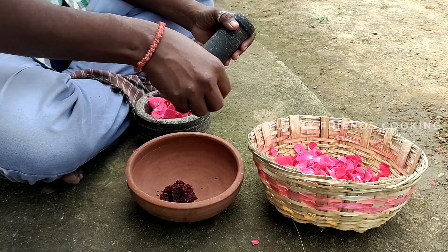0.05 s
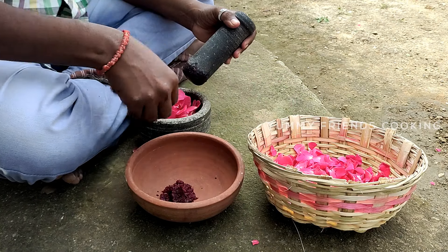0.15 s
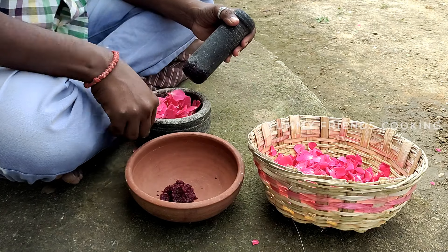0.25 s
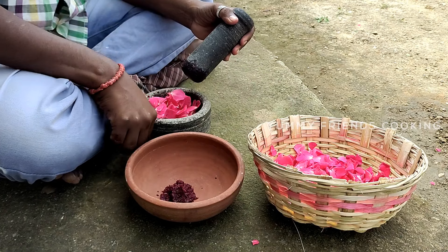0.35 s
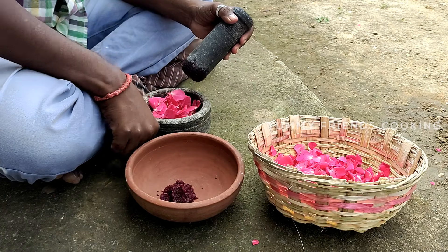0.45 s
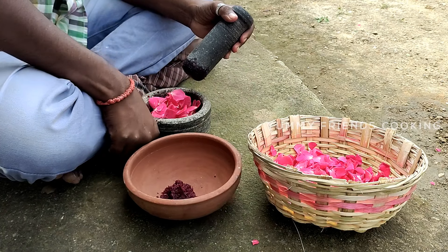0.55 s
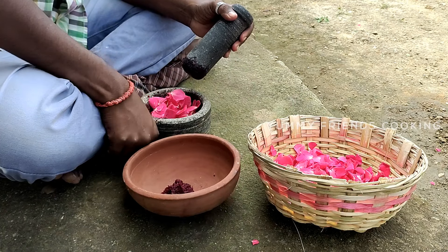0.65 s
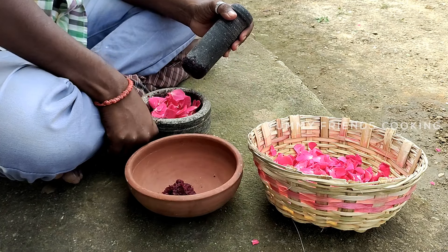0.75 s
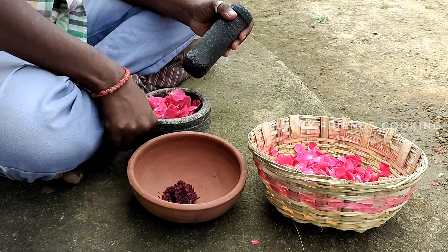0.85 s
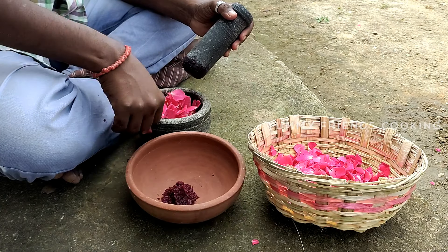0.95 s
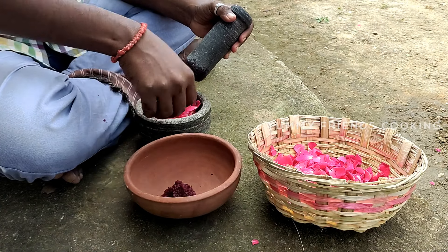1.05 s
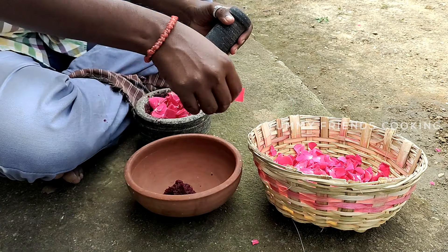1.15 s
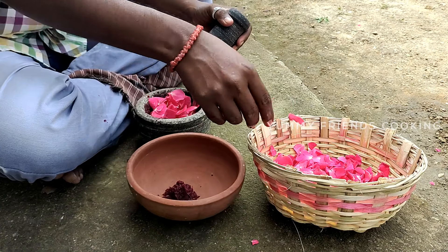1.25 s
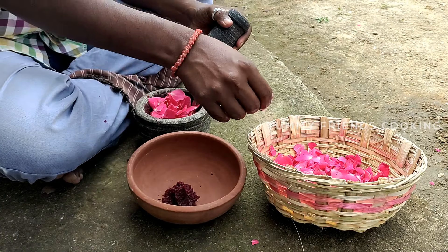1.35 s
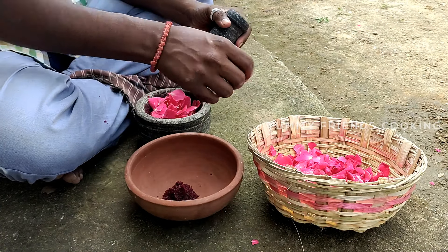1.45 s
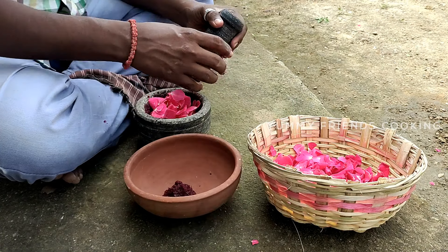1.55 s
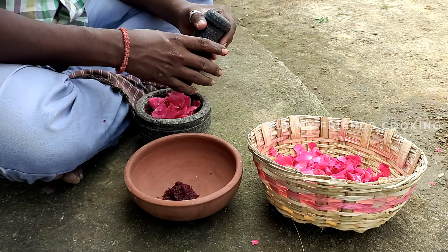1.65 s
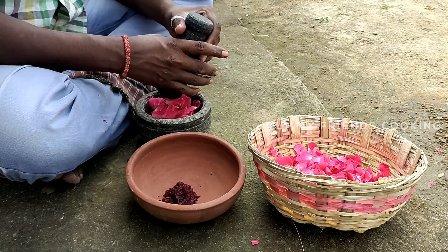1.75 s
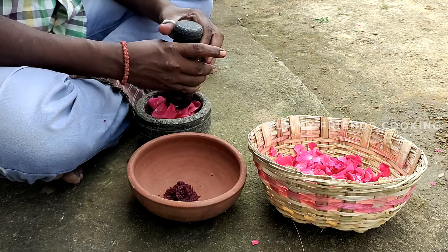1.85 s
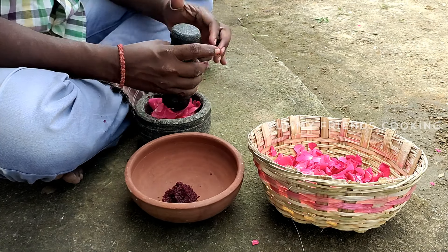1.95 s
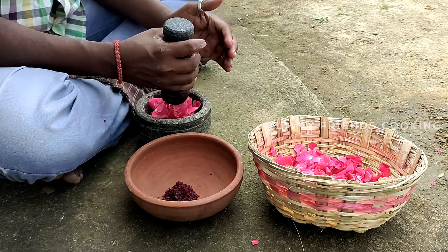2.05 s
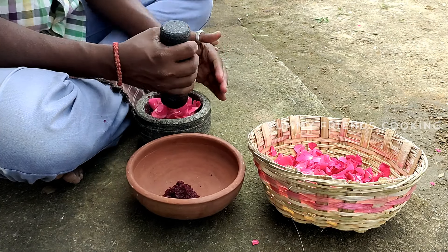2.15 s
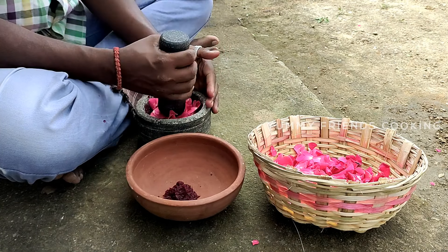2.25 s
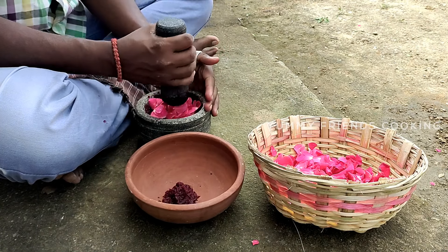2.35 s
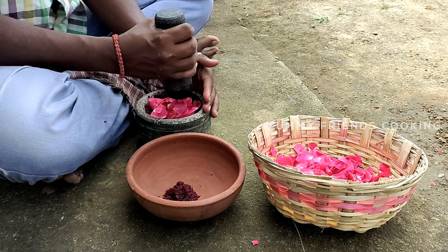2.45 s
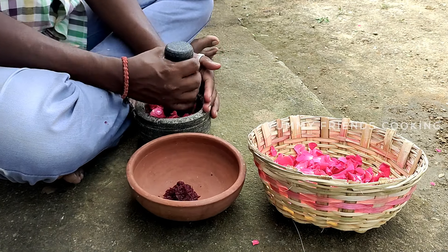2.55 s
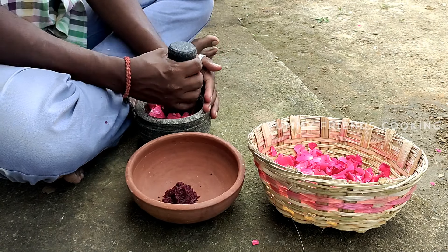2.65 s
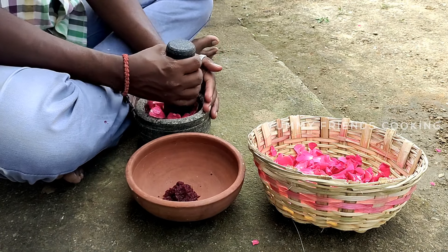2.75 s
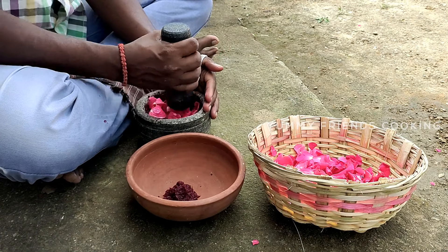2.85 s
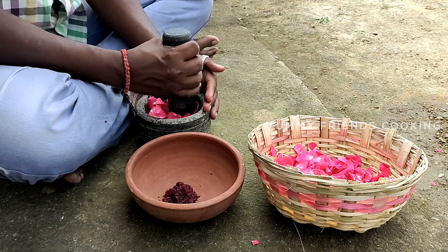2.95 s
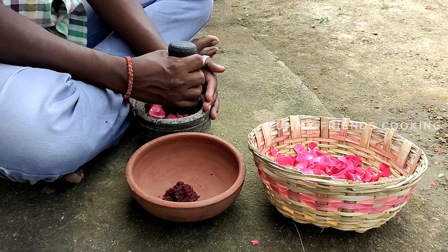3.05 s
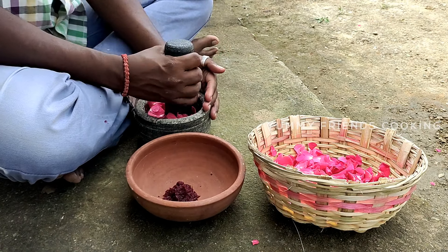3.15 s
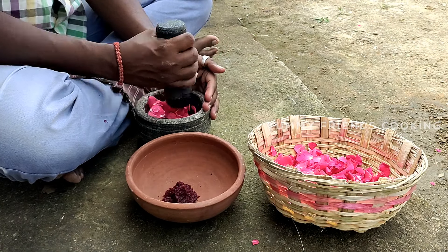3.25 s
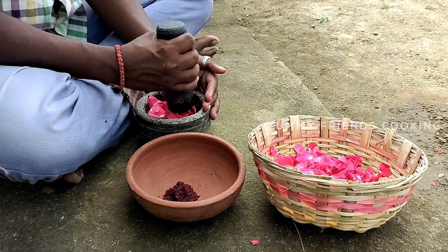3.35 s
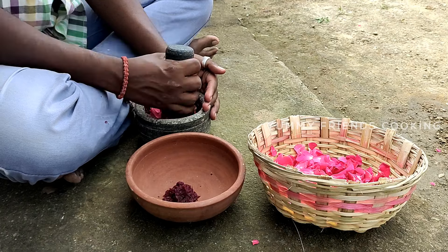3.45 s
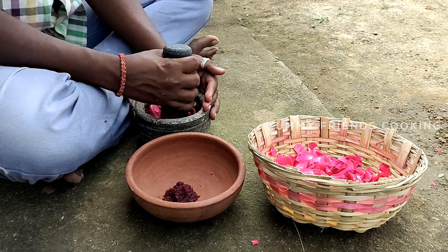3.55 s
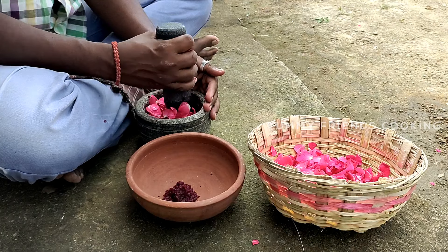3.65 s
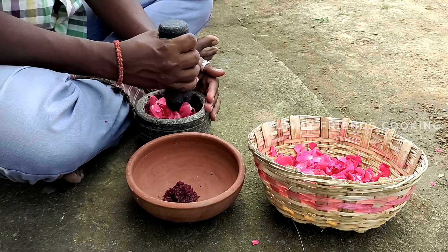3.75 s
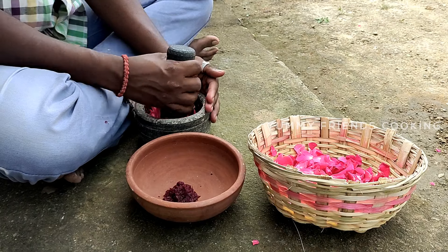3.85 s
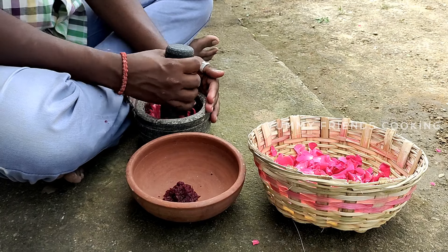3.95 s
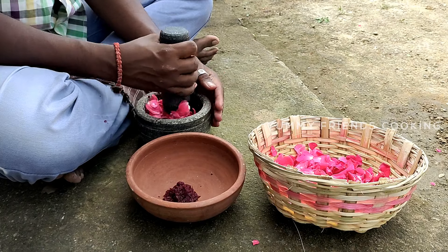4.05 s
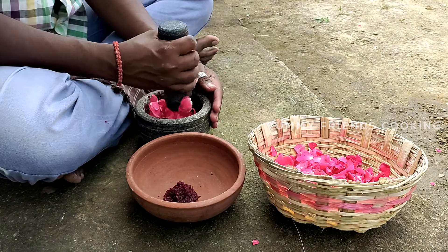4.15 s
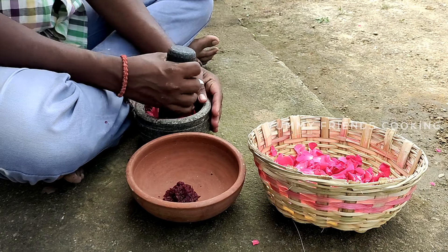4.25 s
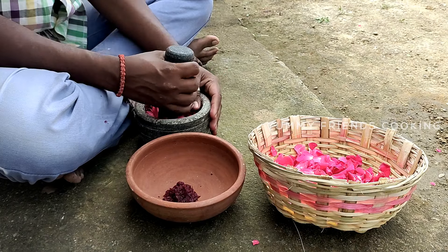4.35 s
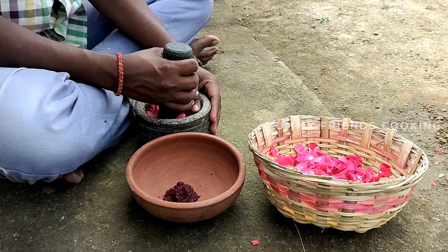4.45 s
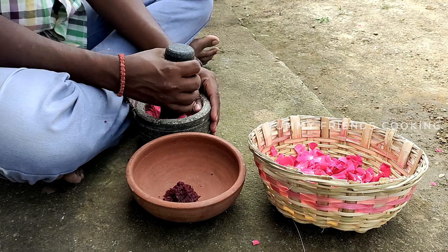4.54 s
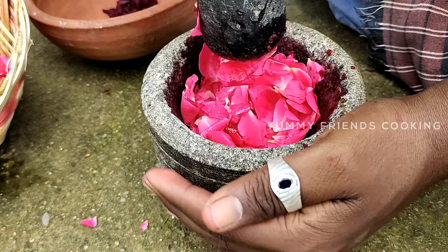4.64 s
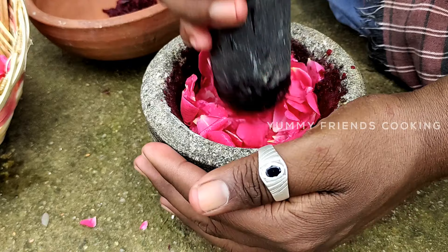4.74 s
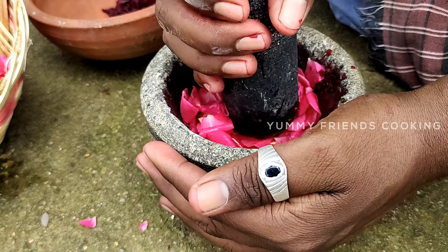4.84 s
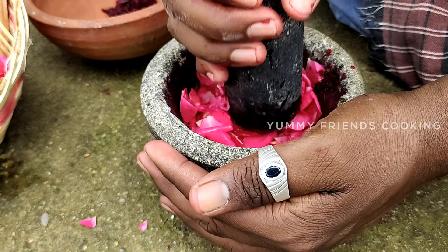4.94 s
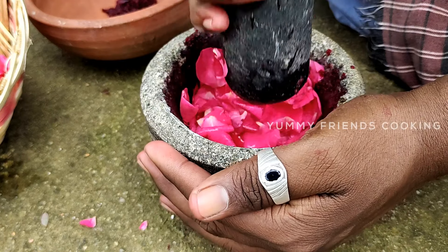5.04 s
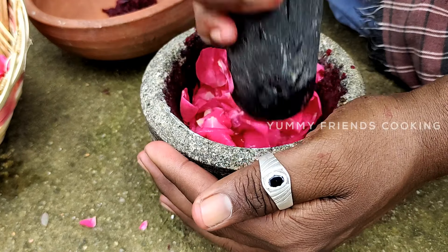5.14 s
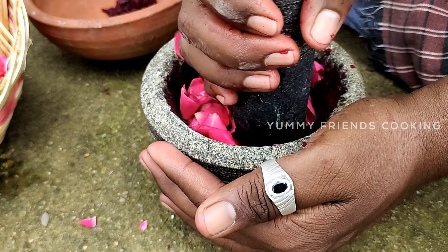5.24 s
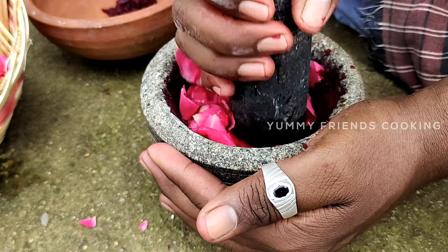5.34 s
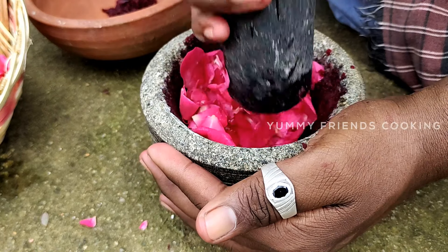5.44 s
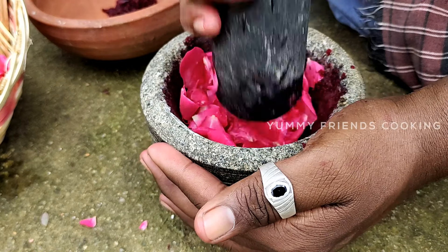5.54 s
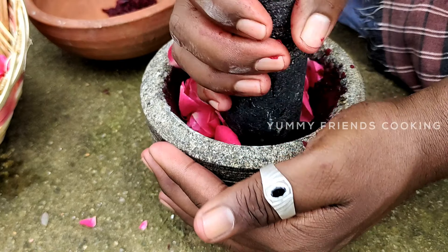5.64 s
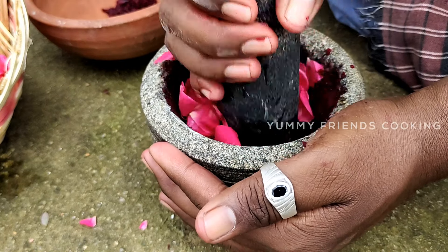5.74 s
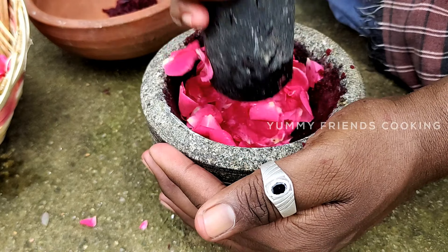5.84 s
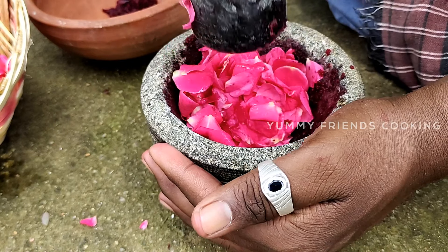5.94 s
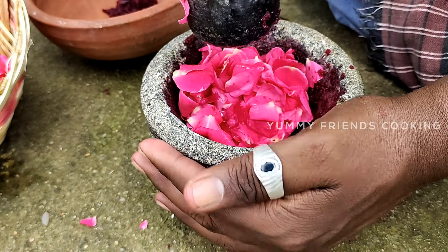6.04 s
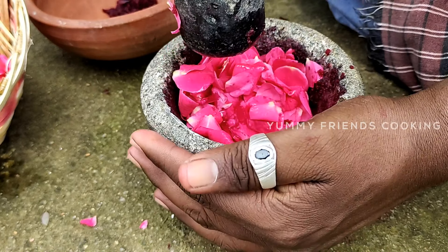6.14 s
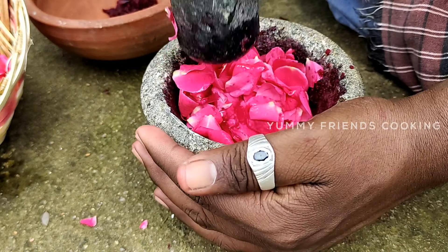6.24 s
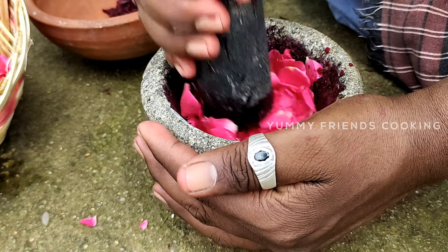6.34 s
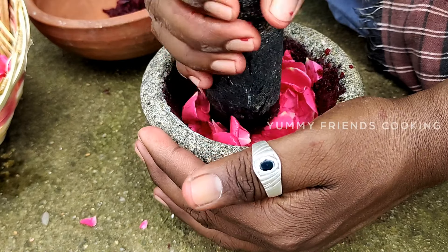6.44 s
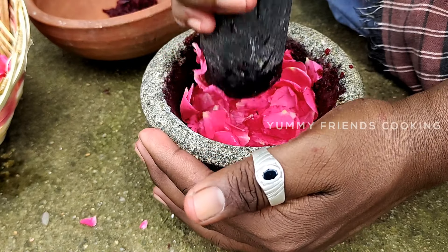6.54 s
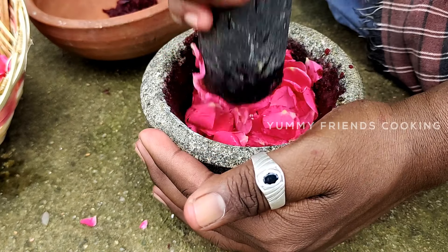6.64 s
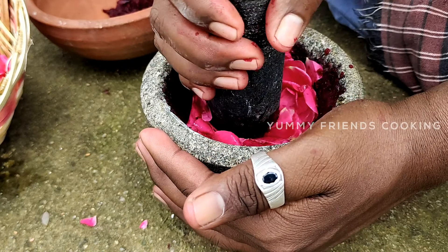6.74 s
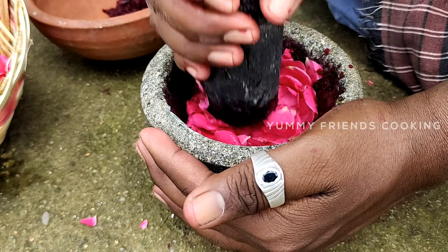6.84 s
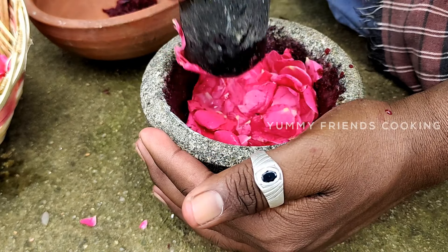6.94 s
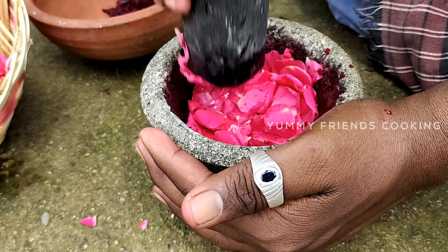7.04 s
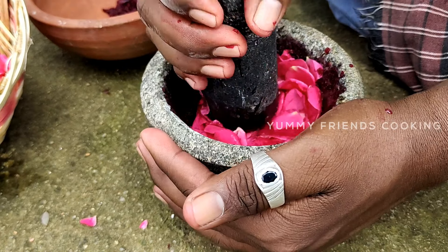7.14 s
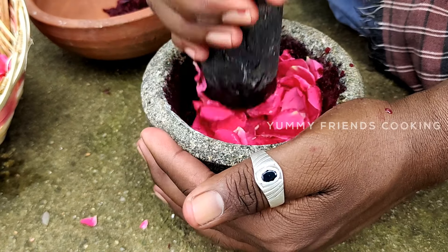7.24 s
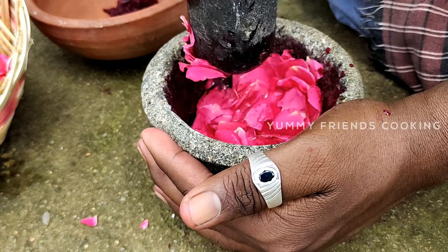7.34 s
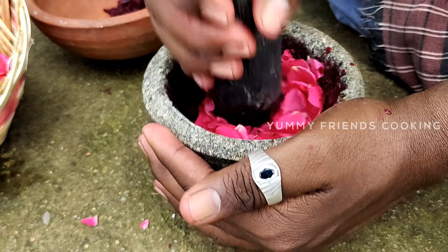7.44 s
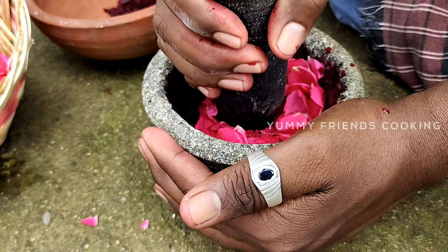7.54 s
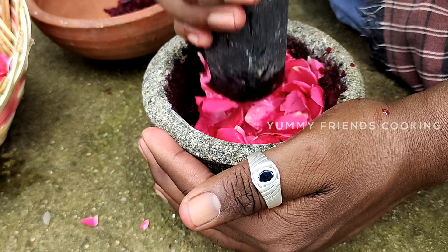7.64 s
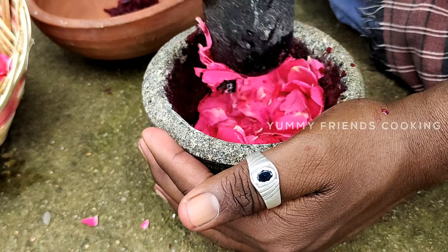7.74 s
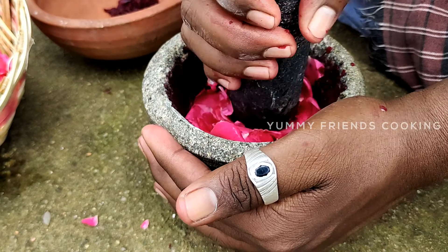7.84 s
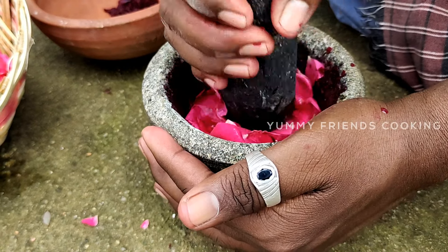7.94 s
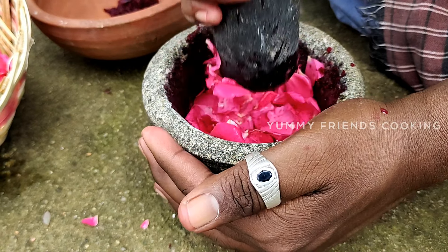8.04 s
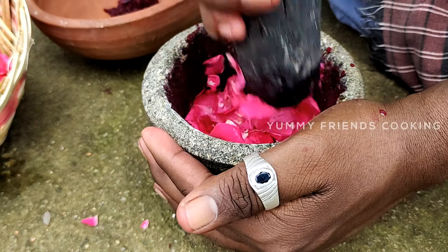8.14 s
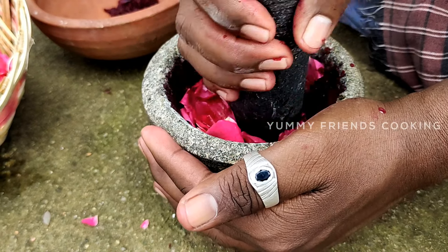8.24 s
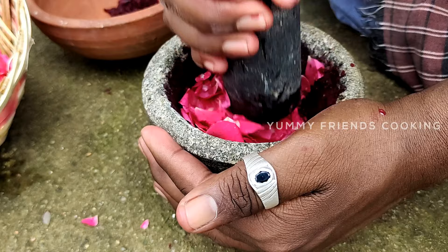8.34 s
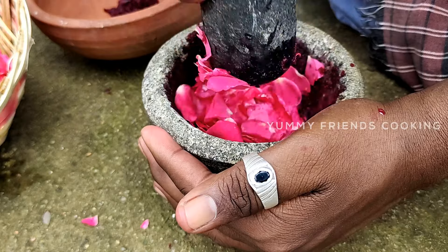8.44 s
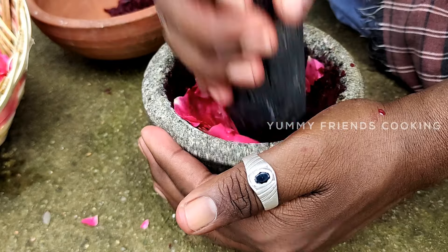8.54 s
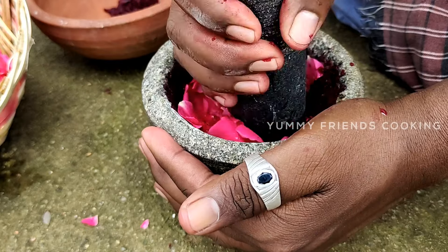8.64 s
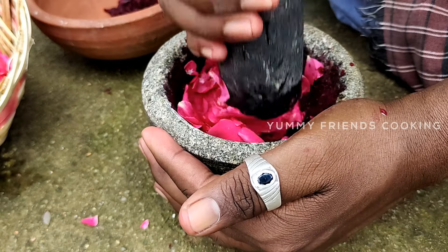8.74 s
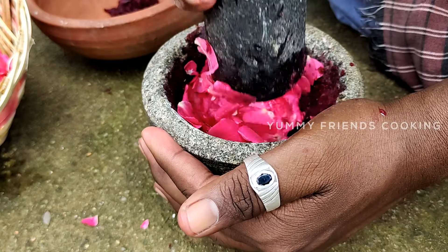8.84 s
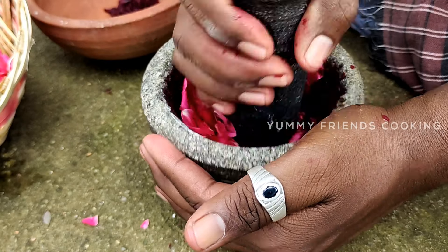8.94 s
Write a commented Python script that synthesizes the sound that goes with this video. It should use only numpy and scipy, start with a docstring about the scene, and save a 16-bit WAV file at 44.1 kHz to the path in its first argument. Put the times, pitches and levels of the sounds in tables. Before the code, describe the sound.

A stone pestle pounds wet flower petals in a small stone mortar outdoors, dull thuds turning to hard clacking knocks, with faint bird chirps.

```python
"""Petals drop into a small stone mortar in a yard, heard as soft crackle, amid chirps and hiss.
From 2.6 s a stone pestle pounds: damped swings thud the mortar down, bursts of noise crush the petals.
The sound drops out briefly near 4.65 s; from 5.3 s the blows are mostly harder, and many reach the stone,
whose damped modes clack. After blows the mortar rocks and lands again, and the pestle skids or pulls free.
Throughout, gliding tones make small birds and far calls, and shaped noise makes rumble and hiss."""
import sys
import numpy as np
from scipy import signal
from scipy.fft import rfft, irfft, next_fast_len
from scipy.io import wavfile
from scipy.ndimage import map_coordinates

SR = 44100
rng = np.random.default_rng(int(sys.argv[2]) if len(sys.argv) > 2 else 0)


def unload_wav(signal):
    """Save mono or channel-first audio to the path in sys.argv[1] as 16-bit WAV at rate SR, clipped to [-1, 1]."""
    wavfile.write(
        sys.argv[1],
        SR,
        np.round(np.clip(np.atleast_2d(signal).T, -1, 1) * 32767).astype(np.int16),
    )


N = 396459
TIME = np.arange(N) / SR  # t/s of the whole scene
AGE = np.arange(SR // 8) / SR  # t/s since one impact
OFF = -120  # level/dB of stone where the petals cushion it

# Blows of the pestle: t/s, thud level/dB, thud f/Hz, ground knock level/dB,
# petals level/dB, hollow level/dB, hollow f/Hz, stone level/dB
BLOWS = [(2.644, -22, 137, -48, -38, -60, 2220, OFF), (3.0735, -16.5, 146, -46, -34.5, -41, 2240, OFF),
         (3.4933, -16, 149, -35, -27.5, -25.5, 2136, OFF), (3.8994, -13, 153, -31, -27, -23.5, 2130, OFF),
         (4.311, -15.5, 157, -31, -29.5, -26, 2310, OFF), (4.8890, -18, 170, -46, -25, -20.5, 1200, OFF),
         (5.3052, -7, 212, -2, -19, -16, 1000, 6), (5.7091, -13, 205, -3.5, -22, -14, 1200, 5),
         (6.4144, -6.5, 192, -11.5, -43, -16, 1120, 3), (6.8082, -7.5, 163, -25, -12, -17, 1270, OFF),
         (7.1803, -8.5, 188, -12, -37, -15, 1990, 3.5), (7.5471, -6, 180, -11, -18.5, -8, 2220, 7),
         (7.9302, -11.5, 200, -28, -20, -24.5, 1560, OFF), (8.2805, -5.5, 200, -3, -21, -13, 2300, 2),
         (8.6587, -3, 192, -12, -14.5, -25, 1180, OFF)]
# Modes of stone on stone: multiple of the clack pitch, level/dB, t60/s
STONE_MODES = [(.96, 1, .007), (1.3, -3.5, .006), (1.77, -2, .007), (2.1, -17, 0.013), (4.25, -22.5, 0.02),
               (5.399, -24.5, 0.0065)]
# Modes of the mortar's foot against the ground: f/Hz, level/dB, t60/s
FOOT_MODES = [(278, -11, .022), (430, 2, .02), (575, -4, 0.017), (880, -11, 0.019)]
# Modes of the air in the bowl around the pestle: multiple of the hollow pitch, level/dB, t60/s
BOWL_MODES = [(1.0, 0, 0.012), (1.35, -5.5, 0.011), (1.72, -10.5, .009), (2.139, -12, 0.0074)]
# Landings of the mortar, tipped by a blow off centre: t/s, thump level/dB, thump f/Hz
LANDINGS = [(2.6798, -33.5, 190), (3.922, -30, 163), (4.3477, -26, 175), (4.4205, -33, 185),
            (4.95, -33.5, 202), (5.3237, -17, 218), (5.74, -31, 229), (6.425, -19, 190), (6.822, -10, 208),
            (7.224, -25, 227), (7.5845, -23, 224), (7.95, -23, 216), (8.311, -8, 201), (8.676, -24, 223)]
# Skids of the pestle down the wall of the bowl: peak t/s, level/dB
SKIDS = [(6.448, -28.5), (7.198, -23), (7.553, -23.5), (8.291, -20.5)]
# Petals dropped into the bowl by the fingers: peak t/s, level/dB
HANDFULS = [(.55, -61), (.96, -59), (1.045, -55.5)]
# Snaps of wet petals: peak t/s, level/dB
SNAPS = [(4.114, -42), (4.88, -44), (7.917, -42), (8.369, -41)]
# Light ticks: t/s, level/dB, f/Hz
TICKS = [(0.749, -47, 650), (1.221, -44.5, 2530), (5.522, -39, 2150)]
# Chirps of small birds: t/s, length/s, starting f/Hz, level/dB
CHIRPS = [(0.047, .035, 7200, -55), (.11, 0.076, 4600, -58), (.6, .12, 4500, -64), (.77, .046, 4400, -62),
          (4.696, 0.059, 4740, -55), (4.76, 0.029, 4590, -51.5), (4.821, .023, 3080, -55),
          (5.124, 0.087, 4700, -46.5), (5.235, .026, 3400, -55), (6.333, 0.045, 5060, -46),
          (7.41, 0.041, 5020, -43), (7.596, 0.031, 4150, -50), (7.661, 0.054, 4050, -49),
          (7.769, 0.043, 4260, -49), (8.344, 0.038, 4770, -47), (8.786, .035, 5230, -43.5)]
# Faint far calls: t/s, length/s, first f/Hz, last f/Hz, level/dB
FAR_CALLS = [(0.119, 0.24, 790, 760, -61), (2.17, 0.17, 373, 432, -58), (4.07, 0.08, 327, 388, -54)]
# Relative spectral density of crushed petals: f/Hz, level/dB per Hz
CRUSH_SPECTRUM = [(200, -10), (700, -3), (1400, -2), (2800, -2), (3800, -4), (5200, -2.5), (7200, 4.5),
                  (8600, -7.5), (12000, -18), (16000, -22)]
# Relative spectral density of sliding petals: f/Hz, level/dB per Hz
SLIDE_SPECTRUM = [(200, -13.5), (800, -6), (1300, -1.5), (2400, -1), (4000, -5), (7200, 0), (8600, -12),
                  (16000, -24)]
# Relative spectral density of the outdoor air: f/Hz, level/dB per Hz
AIR_SPECTRUM = [(25, -15), (50, -9), (100, 2), (150, -3), (370, -10), (600, -12.5), (1000, -16.5),
                (1800, -19), (5700, -24), (6600, -17.5), (7300, -16.5), (8800, -27), (14800, -32),
                (16000, -38)]
# Decay of reflections from the ground, bowls and body: f/Hz, t60/s
NEAR_DECAY = [(150, 0.079), (1500, 0.059), (7000, .05), (14000, 0.022)]
# Decay of reflections in the yard: f/Hz, t60/s
YARD_DECAY = [(150, 0.3), (600, 0.42), (2000, 0.25), (5000, 0.072), (12000, 0.033)]
# Colour of the yard's reflections: f/Hz, level/dB
YARD_COLOUR = [(60, -6.5), (200, -0.5), (700, -12.5), (2200, -11), (4000, -9), (12000, -10)]
# Decay of reflections among the trees: f/Hz, t60/s
TREE_DECAY = [(1000, .5), (10000, 0.43)]
# Gain through the dropout: t/s, level/dB
DROPOUT = [(4.612, -2), (4.622, -64), (4.695, -61), (4.71, -14.5), (4.80, -3)]
# Colour of the gritty crack: f/Hz, level/dB
CRACK_COLOUR = [(600, -3), (2000, 4), (7000, -1), (10000, -7), (16000, -13)]
# Distance dulls the top of the calls: f/Hz, level/dB
DISTANCE_COLOUR = [(8000, 0.5), (14000, -16)]
# Lean of the stereo image: f/Hz, left minus right level/dB
LEAN = [(120, 2.0), (500, 0.24), (2000, -.1), (6000, -0.96)]

MEDIUM_DB = -12  # thud of a medium blow
# time to flatten the petals: at a medium blow, dB of thud that halve it, and when stone is reached
SQUEEZE_S, SQUEEZE_HALVES_DB, STONE_SQUEEZE_S = .0033, 16, .00095
CLACK_HZ = 1230  # pitch of stone on stone
LANDING_KNOCK_DB, KNOCK_GROWS = 5, 1.55  # knock of a 0 dB landing; dB of knock per dB of thump
FLIGHT_S, LANDING_LOSS_DB, HELD_DB = .047, 8, -33  # next landing: delay, loss, ceiling set by the hand
# pestle leaves the wet petals: delay, level after a medium blow, dB per dB of thud, rise and fall
LIFT_S, LIFT_DB, LIFT_GROWS, LIFT_RISE_S, LIFT_FALL_S = .135, -54.5, .6, .03, .03
SKID_RISE_S, SKID_FALL_S = .003, .0062
HANDFUL_RISE_S, HANDFUL_FALL_S = .035, .025
SNAP_RISE_S, SNAP_FALL_S = .001, .0016
# chirps sag toward one low note; least fall as a share; chirps longer than SAG_S fall less
REST_HZ, LEAST_SAG, SAG_S = 3950, .05, .032
RUMBLE_HZ, TOP_HZ = 62, 15900  # lower and upper cut


def amp(db):
    """Logarithmic level: decibels to linear gain."""
    return 10 ** (np.asarray(db) / 20)


def unit(x):
    """Normalisation: the signal scaled to rms 1."""
    return x / np.sqrt(np.mean(x ** 2) + 1e-20)


def along(points, hz):
    """Log-frequency interpolation of (f/Hz, value) points."""
    f, v = np.transpose(points)
    return np.interp(np.log(hz + 1), np.log(f + 1), v)


def curve(rows):
    """Linear interpolation in time of (t/s, value) rows."""
    return np.interp(TIME, *np.transpose(rows))


def wobble(rate, size):
    """Band-limited randomness: a smooth curve through rate random knots a second."""
    knots = rng.standard_normal(int(size * rate / SR) + 4)
    return map_coordinates(knots, [np.arange(size) * rate / SR])


def filtered(x, response):
    """Linear filtering: the spectrum times a response of frequency."""
    m = next_fast_len(N + SR // 2)
    spectrum = rfft(x, m) * response(np.fft.rfftfreq(m, 1 / SR))
    return irfft(spectrum, m)[..., :N]


def coloured(x, colour):
    """Spectral shaping by (f/Hz, level/dB) points."""
    return filtered(x, lambda hz: amp(along(colour, hz)))


def add(track, s, sound):
    """Superposition: a sound mixed into the track in place at time s."""
    part = track[max(round(s * SR), 0):][:len(sound)]
    part += sound[:len(part)]


def ring(hz, t60):
    """Damped free vibration of one struck mode, falling 60 dB in t60."""
    return np.sin(2 * np.pi * hz * AGE) * np.exp(-np.log(1000) * AGE / t60)


def swell(s, rise, fall):
    """Two-sided exponential envelope that grows to 1 at time s and dies away."""
    return np.exp(-np.minimum(np.maximum((s - TIME) / rise, (TIME - s) / fall), 20))


def crackle(spectrum, rate, bed):
    """Shot noise: dense tiny bursts of random size on a bed of noise, rms 1."""
    grains = (rng.random(N) < rate / SR) * rng.standard_normal(N)
    return unit(coloured(unit(grains) + bed * rng.standard_normal(N), spectrum))


def thud(hz, crest=0.67, steep=2.0):
    """Damped bounce of the mortar on the ground: the swing builds for crest cycles, then dies."""
    u = hz * AGE / crest
    return np.sin(2 * np.pi * hz * AGE) * (u * np.exp(1 - u)) ** steep


def knock():
    """Modal superposition: the foot of the mortar knocks on the hard ground."""
    return sum(amp(db + rng.normal(0, 1)) * ring(hz, t60) for hz, db, t60 in FOOT_MODES)


def pounding(contact=.0002):
    """Impulsive loading: each blow thuds the mortar down and knocks its foot on the ground."""
    out = np.zeros(N)
    for s, db, hz, knock_db, *_ in BLOWS:
        foot = amp(knock_db) * knock() * (1 - np.exp(-AGE / contact))
        add(out, s, amp(db) * thud(hz) - foot)
    return out


def strikes(contact=0.00026, crack_db=-19, crack_fall=0.001):
    """Heavily damped modes of stone on stone, with a gritty crack; hand and paste damp the ring."""
    out, crack = np.zeros(N), np.zeros(N)
    for s, *_, db in BLOWS:
        if db > OFF:
            clack = np.zeros(len(AGE))
            # neighbouring modes swing in opposite directions and merge into one broad clack
            for k, (ratio, level, t60) in enumerate(STONE_MODES):
                clack += (-1) ** k * amp(level + rng.normal(0, 1)) * ring(CLACK_HZ * ratio, t60)
            grit = rng.standard_normal(len(AGE)) * np.exp(-AGE / crack_fall)
            add(crack, s, amp(db + crack_db) * grit)
            add(out, s, amp(db) * clack * (1 - np.exp(-AGE / contact)))
    return out + coloured(crack, CRACK_COLOUR)


def petals(release=0.0037, onset=0.00049, touch_db=-23, touch_rise=.009, touch_fall=0.015):
    """Burst noise of crushed petals, which also excites the air resonances of the bowl."""
    air_in_bowl, pressure = np.zeros(N), np.zeros(N)
    for s, thud_db, _, _, crush_db, hollow_db, hollow_hz, stone_db in BLOWS:
        if stone_db > OFF:
            squeeze = STONE_SQUEEZE_S
        else:  # harder blows flatten the petals sooner
            squeeze = SQUEEZE_S * 2 ** ((MEDIUM_DB - thud_db) / SQUEEZE_HALVES_DB)
        first_touch = s - squeeze
        # the bursting starts at first touch and fades once the cushion is flat
        burst = (1 - np.exp(-AGE / onset)) * np.exp(-np.maximum(AGE - squeeze, 0) / release)
        add(pressure, first_touch, amp(crush_db) * burst)
        # loose petals are brushed just before and after
        pressure += amp(crush_db + touch_db) * swell(first_touch, touch_rise, touch_fall)
        bowl = sum((-1) ** k * amp(db) * ring(hollow_hz * ratio, t60)
                   for k, (ratio, db, t60) in enumerate(BOWL_MODES))
        hollow = signal.fftconvolve(burst ** 2 * rng.standard_normal(len(AGE)), bowl)
        rms = np.sqrt(np.sum(hollow ** 2) / (.005 * SR))  # energy referred to 5 ms
        add(air_in_bowl, first_touch, amp(hollow_db) * hollow / rms)
    return air_in_bowl + pressure * crackle(CRUSH_SPECTRUM, rate=9000, bed=.8)


def rocking(contact=0.00037, count=2):
    """Repeated impact with energy loss: the tipped mortar lands, then once more, softer."""
    out = np.zeros(N)
    for s, db, hz in LANDINGS:
        for _ in range(count):
            # the knock weakens faster than the thump
            foot = amp(LANDING_KNOCK_DB + KNOCK_GROWS * db) * knock() * (1 - np.exp(-AGE / contact))
            add(out, s, amp(db) * thud(hz, crest=.55, steep=2.5) + foot)
            s, db = s + FLIGHT_S, min(db - LANDING_LOSS_DB, HELD_DB)
    return out


def rustling():
    """Friction noise under envelopes: pestle skids and lifts, petals drop and snap; ticks ring."""
    handfuls = sum(amp(db) * swell(s, HANDFUL_RISE_S, HANDFUL_FALL_S) for s, db in HANDFULS)
    lifts = sum(amp(LIFT_DB + LIFT_GROWS * (db - MEDIUM_DB)) * swell(s + LIFT_S, LIFT_RISE_S, LIFT_FALL_S)
                for s, db, *_ in BLOWS)
    skids = sum(amp(db) * swell(s, SKID_RISE_S, SKID_FALL_S) for s, db in SKIDS)
    snaps = sum(amp(db) * swell(s, SNAP_RISE_S, SNAP_FALL_S) for s, db in SNAPS)
    envelope = lifts + skids + handfuls + snaps
    out = envelope * crackle(SLIDE_SPECTRUM, rate=3000, bed=0.35)
    for s, db, hz in TICKS:
        add(out, s, amp(db) * (ring(hz, .012) + ring(hz * 1.2, .009)))
    return out


def echo(x, decay, delay):
    """Diffuse reverberation: each stretch of sound is convolved with a fresh decaying noise tail."""
    out, step = np.zeros(N), SR // 3
    for start in range(0, N, step):
        hz, t, z = signal.stft(rng.standard_normal(SR // 2), SR, nperseg=128)
        fading = z * amp(-60 * t / along(decay, hz)[:, None])
        tail = signal.istft(fading, SR, nperseg=128)[1]
        reflected = signal.fftconvolve(x[start:start + step], tail / np.linalg.norm(tail))
        add(out, start / SR + delay, reflected)
    return out


def whistle(hz, waver, overtone_db):
    """Frequency modulation: a wavering note with its octave, along a pitch for each sample."""
    wavering = hz * (1 + waver * wobble(440, size=SR)[:len(hz)])
    phase = 2 * np.pi * np.cumsum(wavering) / SR
    envelope = np.sqrt(np.abs(np.sin(np.linspace(0, np.pi, len(hz)))))
    return envelope * (np.sin(phase) + amp(overtone_db) * np.sin(2 * phase))


def birds(direct_db=-2, wet_db=-5, bend=2.5, rasp=.14):
    """Gliding tones with reverberation: falling chirps and low far calls among the trees."""
    calls = np.zeros(N)
    for s, length, hz, db in CHIRPS:
        # a steeper drop brings more rasp; long chirps are cleaner
        drop = min(SAG_S / length, 1) * max(1 - REST_HZ / hz, LEAST_SAG)
        pitch = hz * (1 - drop * np.linspace(0, 1, int(length * SR)) ** bend)
        add(calls, s, amp(db) * whistle(pitch, waver=rasp * drop, overtone_db=-6.5))
    for s, length, first_hz, last_hz, db in FAR_CALLS:
        pitch = np.linspace(first_hz, last_hz, int(length * SR))
        add(calls, s, amp(db) * whistle(pitch, waver=.005, overtone_db=-22.5))
    calls = coloured(calls, DISTANCE_COLOUR)
    return amp(direct_db) * calls + amp(wet_db) * echo(calls, TREE_DECAY, delay=0.011)


def air(db=-55.6, drift_db=0.38, side_db=-24):
    """Stationary shaped noise, barely drifting: outdoor rumble and hiss, highly correlated in stereo."""
    mid, side = unit(coloured(rng.standard_normal((2, N)), AIR_SPECTRUM))
    pair = mid + amp(side_db) * np.array([side, -side])
    return pair * amp(db + drift_db * wobble(9.5, size=N))


def scene(near_db=-14, yard_db=-26.5, side_db=-33):
    """Superposition of direct sound, reflections and background; bass leans left, treble right."""
    work = petals() + pounding() + strikes() + rocking() + rustling()
    near = amp(near_db) * echo(work, NEAR_DECAY, delay=.003)
    yard = amp(yard_db) * coloured(echo(work, YARD_DECAY, delay=.014), YARD_COLOUR)
    side = amp(side_db) * echo(work, NEAR_DECAY, delay=.001)  # a few reflections arrive sideways
    pair = work + near + yard + np.array([side, -side]) + birds() + air()
    return filtered(pair, lambda hz: amp(np.outer([.5, -.5], along(LEAN, hz))))


def record(dry):
    """Band limiting and clipping: deep bass is shed, the sound drops out once, peaks clip, the top is cut."""
    thinned = filtered(dry, lambda hz: 1 / (1 + (RUMBLE_HZ / (hz + 1)) ** 3.5))
    clipped = np.clip(thinned * amp(curve(DROPOUT)), -1, 1)
    return filtered(clipped, lambda hz: 1 / (1 + (hz / TOP_HZ) ** 80))


dry = scene()
out = record(dry)
unload_wav(out)
```